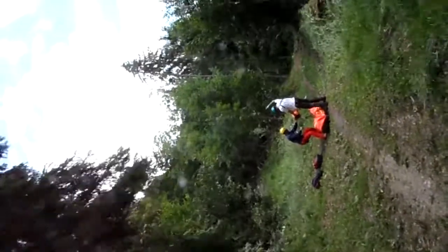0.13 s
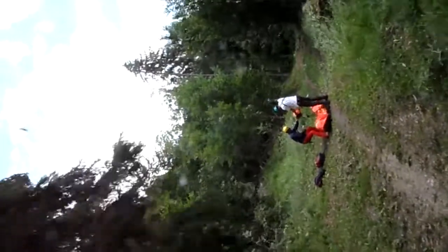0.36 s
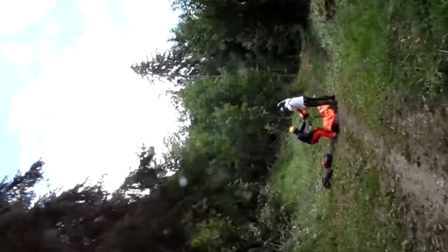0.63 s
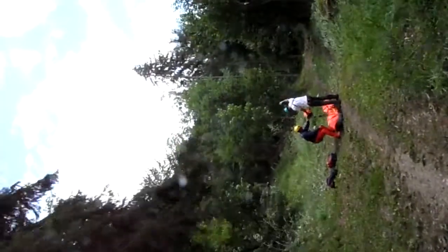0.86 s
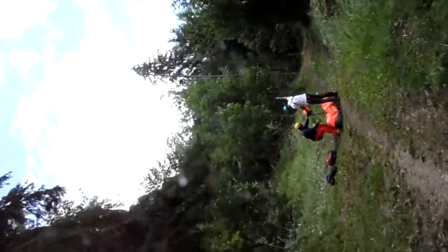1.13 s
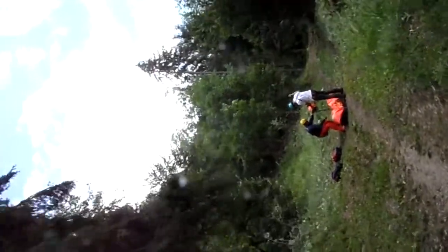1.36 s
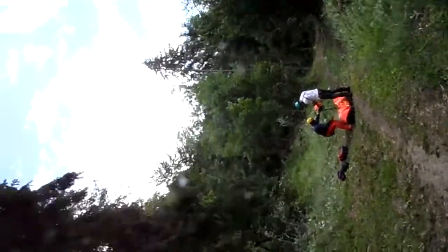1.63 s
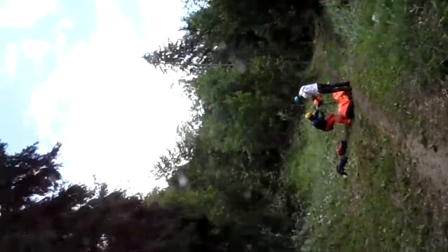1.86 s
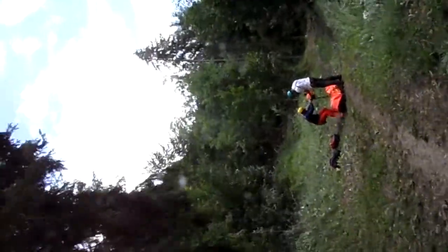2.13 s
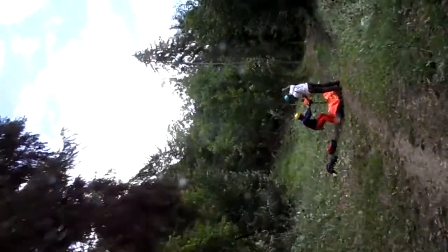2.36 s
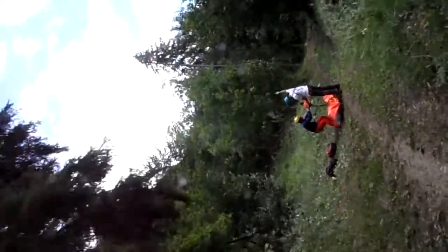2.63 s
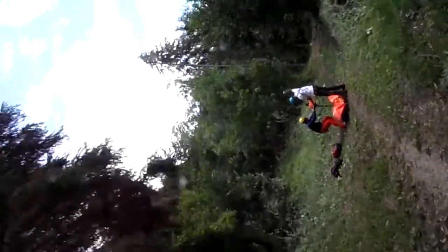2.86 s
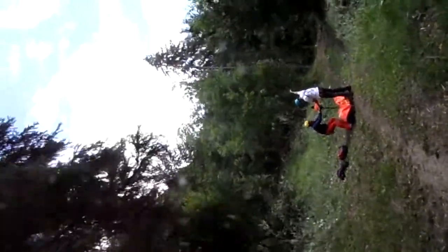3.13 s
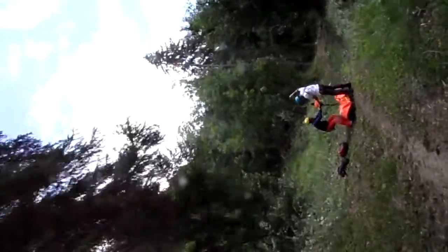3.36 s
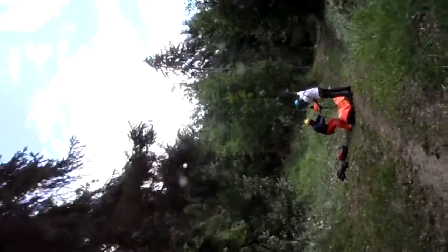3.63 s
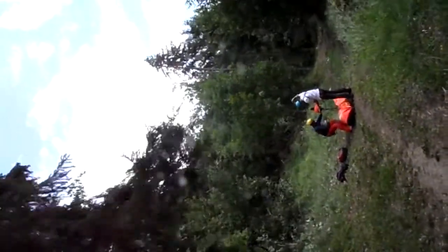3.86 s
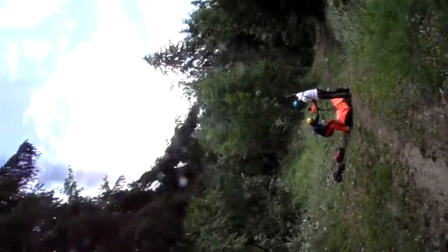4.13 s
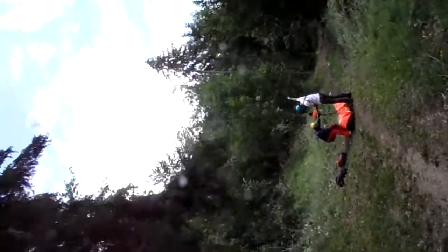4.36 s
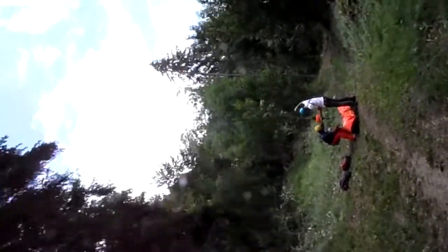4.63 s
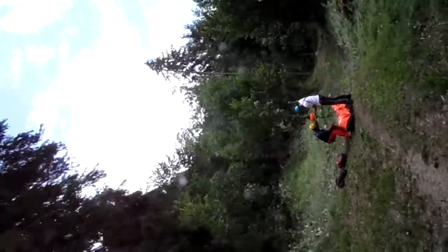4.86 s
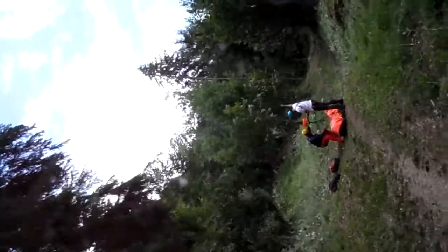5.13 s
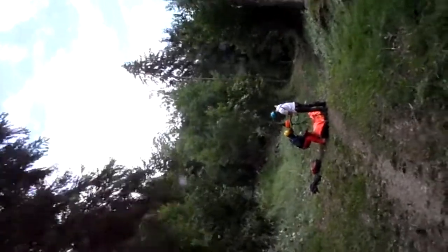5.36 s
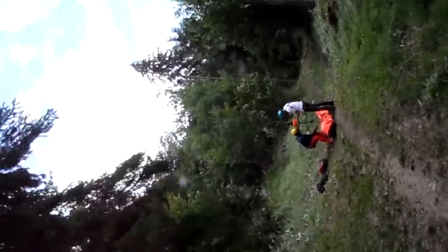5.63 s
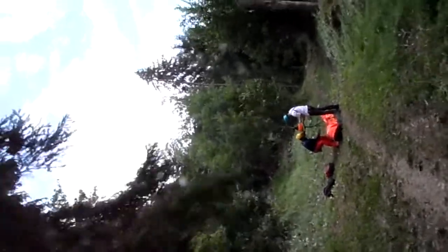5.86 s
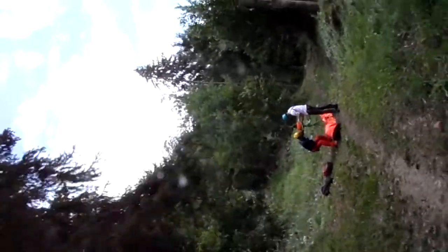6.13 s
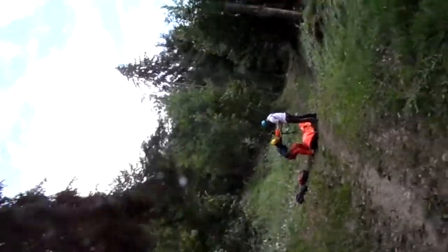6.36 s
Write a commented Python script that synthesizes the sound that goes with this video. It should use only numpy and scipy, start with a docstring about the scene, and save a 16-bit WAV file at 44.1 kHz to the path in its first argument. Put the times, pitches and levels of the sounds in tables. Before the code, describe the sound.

Outdoor handheld stereo capture under a hovering helicopter. A continuous droning hum and dull roar sit behind powerful wind buffeting, with low booming shoves, fluttering rumble, short rasps and sharp crackling pops differing left and right. The blade chop surfaces briefly around three seconds when the wind tearing stops. Strong blasts later overload the microphone, and the aircraft sound sinks and swells back. No speech.

```python
"""A forest clearing with a helicopter hovering above: the tail rotor hums as a sum of harmonics,
the main blades chop as gated noise bursts, and the turbines roar as patchy broadband noise.
The downwash buffets two microphone ports with lumps, flutter and rasp partly or wholly independent at
each port, with short swings a little out of step, and with crisp steps alike except in level.
At set times the whole sound drops in level and climbs back."""
import sys
import numpy as np
from scipy import signal
from scipy.fft import rfft, irfft, next_fast_len
from scipy.io import wavfile
from scipy.ndimage import uniform_filter1d, map_coordinates

SR = 44100
rng = np.random.default_rng(int(sys.argv[2]) if len(sys.argv) > 2 else 0)


def master_out(mix):
    """Clip the mix to full scale and print it as 16-bit PCM to the path in sys.argv[1]."""
    frames = np.transpose(np.atleast_2d(mix))
    ceiling = np.clip(frames, -1, 1)
    pcm = np.round(ceiling * 32767).astype(np.int16)
    wavfile.write(sys.argv[1], SR, pcm)


def gain_from_db(level_db):
    """Convert decibel levels to linear amplitude factors (20 dB per decade)."""
    decades = np.asarray(level_db, float) / 20
    return 10 ** decades


N = 285988  # samples

# Source levels below apply ahead of the level dips and the rounding of peaks.
# Spectra give the shape only: (frequency [Hz], relative density [dB per Hz])
ROAR_SPECTRUM = [(15, -40), (50, -15.5), (100, -6), (250, -6.5), (600, -13), (1100, -22.5), (2000, -30),
                 (4000, -37.5), (6000, -41), (8000, -45), (10500, -48), (14200, -52.5)]
CHOP_SPECTRUM = [(200, -10.5), (500, 12.5), (1000, 3), (2000, -9), (4000, -23), (8000, -54)]
LUMP_SPECTRUM = [(5, 3), (14, 15.5), (28, 13), (45, 1.5), (70, -0.5), (140, -19), (300, -57.5)]
EDDY_SPECTRUM = [(30, -2.5), (70, 5.5), (150, -3), (300, -9.5), (600, -19.5), (1200, -32.5), (3000, -71.5)]
TEAR_SPECTRUM = [(150, -14), (400, 0), (1000, -6.5), (2000, -17), (3500, -31.5), (6000, -54)]
HISS_SPECTRUM = [(1500, -10), (3000, 3.5), (5000, -3.5), (7000, -13), (9000, -28), (14000, -50)]

# Treble of the roar: (time [s], gain [dB])
ROAR_TREBLE = [(0, 1), (.4, 2.5), (.6, -1.5), (1.9, 0), (2.5, 0.5), (3.3, -.5), (4.9, 0.5), (5.5, 2),
               (6.48, 0)]
# Tail rotor harmonics: (multiple of the blade rate [1], level [dB])
TAIL_HARMONICS = [(1, -23.5), (2, -22.5), (3, -20.5), (4, -31), (5, -27.5), (6, -32.5), (7, -49),
                  (8, -34.5), (9, -42.5)]
# Hum as the aircraft drifts:
# (time [s], level [dB], tilt per multiple about the third [dB], even over odd multiples [dB])
HUM_DRIFT = [(0, 0, 0, -2), (.45, -0.5, -0.5, 1.5), (1.1, 2.5, 1.5, -6.5), (1.6, 1.5, .5, -1.5),
             (2.2, 0.5, -1.5, -0.5), (2.9, -1, 0.5, 2.5), (3.7, -1, -1, 3), (4.3, -3, -0.5, 2),
             (4.95, -0.5, -2, -4), (5.6, 1.5, 1, -3), (6.48, 0, 0.5, -1)]
# Main blades cutting their own wake: (time [s], level [dB])
CHOP_LEVEL = [(0, -48), (.2, -30), (.35, -24.5), (.6, -35.5), (1.2, -29.5), (1.6, -48), (2.4, -46),
              (2.78, -30.5), (2.88, -20), (3.05, -25), (3.25, -29.5), (3.42, -28), (3.57, -21.5),
              (3.7, -25), (4.2, -32), (5.6, -32), (5.8, -24.5), (6.1, -38), (6.48, -43.5)]
# Correlation of the aircraft sound at the ports: (frequency [Hz], correlation [-1 to 1])
PORT_CORRELATION = [(60, .75), (150, .82), (400, .9), (900, .84), (1800, .7), (3500, .34), (5000, 0),
                    (6500, -.22), (9000, -.15), (13000, .2)]
# Balance of the aircraft sound: (frequency [Hz], left over right [dB])
PORT_BALANCE = [(60, -2.5), (240, -4), (930, -2.5), (3660, 1), (14400, 0)]

# Downwash between the shoves: (time [s], left level [dB], right level [dB])
WASH_LEVEL = [(0, -21, -25), (.5, -19, -14), (1.1, -12.5, -12.5), (1.6, -10, -16), (1.95, -10, -11),
              (2.08, -7, -15), (2.3, -13, -9), (2.7, -20, -18), (3.5, -17.5, -15.5), (4.2, -13.5, -16),
              (4.6, -12.5, -19.5), (5.1, -6, -17), (5.4, -21, -24), (5.6, -16, -26), (5.9, -14, -12.5),
              (6.2, -4, -8.5), (6.48, -13, -9)]
# Air tearing past a port edge:
# (start [s], length [s], left level [dB], right level [dB], hiss over tear [dB])
RASP_BURSTS = [(0.599, 0.011, -15, -34, -32), (0.628, 0.054, -18.5, -18, -20),
               (0.707, 0.037, -17.5, -18, -17), (0.943, .011, -37, -19, -24), (1.166, 0.032, -28, -18, -22),
               (1.25, 0.018, -17, -15, -22), (1.314, 0.062, -20, -18, -24), (1.48, 0.098, -16.5, -43, -24),
               (1.648, 0.11, -15.5, -38, -20.5), (1.818, 0.071, -18, -22, -19),
               (1.863, 0.075, -11, -11, -18), (1.938, .038, -15, -20.5, -9), (4.68, 0.083, -13, -44, -15.5),
               (5.043, 0.015, -16, -35, -23), (5.115, 0.111, -12, -12, -13),
               (5.824, 0.058, -17.5, -21, -30), (5.937, 0.0068, -7, -10, -33),
               (6.006, 0.019, -15, -37, -21), (6.126, 0.011, -6.5, -37, -18),
               (6.22, 0.071, -14.5, -38, -20), (6.31, 0.055, -13.5, -39, -20), (6.397, 0.074, -9, -38, -19)]
# Sudden pressure steps: (time [s], peak level [dB], left over right [dB])
PRESSURE_STEPS = [(.607, -6, 4), (.641, -14, 1), (.657, -14, 0), (.722, -10, 0), (1.258, -9, 0),
                  (1.647, -22, 9), (2.362, -2.5, 3), (2.432, -9, 7), (4.752, -6, 10), (4.866, -6, 18),
                  (5.055, -13.5, 18), (5.111, 0.5, 7), (5.187, -9, 6), (6.011, -5, 14), (6.021, -15, 11),
                  (6.114, -14, 16), (6.134, -9, 18), (6.411, -6, 15)]
# Single shoves of air:
# (centre [s], swing [Hz], left envelope peak [dB], right envelope peak [dB], flutter over shove [dB])
AIR_SHOVES = [(.068, 54.4, -19, -11, -12), (.215, 55, -20, -22, -19), (0.394, 41, -25, -12, -10),
              (0.442, 44, -9.5, -10.5, 0), (.515, 55, -17, -12, -24), (0.576, 41, -4, -4, -8.5),
              (0.72, 24, -3, -6, -6.5), (0.954, 43.6, -10, -1, -7.5), (1.194, 27, -4, -2, -17),
              (1.273, 29.6, -1, -1, -19), (1.357, 40, -5, -12, -18), (1.489, 45.7, -3, -2, -4),
              (1.652, 51, -1.5, -4, -13), (1.716, 54.6, -12.5, -6, 2.5), (1.775, 38, -1.5, -1, -14),
              (1.857, 33, -12, 4, -2), (1.928, 38, -4, 3, -3), (2.352, 52, -6, 0, -10),
              (2.437, 30.4, -7, -5.5, -5), (2.545, 32.8, -4, -7, -10.5), (2.9, 55, -12, -17, -10),
              (2.976, 55, -8, -10.5, -5), (3.043, 50, -9, -9, -8), (3.199, 40.3, -6, -5, -39),
              (3.259, 36.3, -3, -4.5, -17), (3.432, 45, -8, -14, -8.5), (3.52, 62, -16, -16, -5),
              (3.632, 50, -14, -8, -5), (3.8, 45, -20, -16, -3), (3.956, 55.6, -3, -22, -13),
              (4.077, 32, -11.5, -8, 0.5), (4.299, 28.8, -7, -4, -1.5), (4.391, 40, -1, -7, -25),
              (4.499, 23, -6, -7, -10), (4.57, 64, -9, -24, 5.5), (4.69, 41.8, 3.5, 2, -8),
              (4.756, 35, 5, 5, -9.5), (4.814, 48, 1.5, -7, -6), (4.868, 50.7, 11, -3, -14),
              (4.975, 45.3, 1, -22, -17), (5.052, 43.6, 7.5, 3.5, -12), (5.123, 58, -9, 6, -3.5),
              (5.221, 33, 4, 0, -22), (5.275, 22, 2, -2, -31), (5.549, 56.3, -4, -5, -36),
              (5.748, 40, -16, -4, 0.5), (5.819, 40, -10, -2.5, -3), (5.975, 45, 3, -2, -4.5),
              (6.051, 35, -2, -8, -1), (6.138, 38, 9.5, 2, -19), (6.233, 45.2, 1, -6, 0),
              (6.35, 27, -4, -6, -2), (6.408, 60, -5.5, -20, 8), (6.459, 33, 2.5, -6, -12)]
# Dips of the whole sound: (time of full depth [s], gain [dB])
LEVEL_DIPS = [(0, -4.5), (0.431, -6.5), (.6, -6.5), (.76, -8.5), (.97, -10.5), (1.3, -9.5), (1.48, -10),
              (1.66, -10), (1.85, -13), (1.99, -19.5), (2.44, -8), (2.93, -4.5), (3.06, -6.5), (3.26, -5.5),
              (3.65, -6.5), (3.9, -5.5), (4.08, -8), (4.31, -10), (4.5, -10), (4.68, -12), (4.77, -16.5),
              (4.88, -15.5), (5.07, -18.5), (5.17, -18.5), (5.25, -16.5), (5.76, -8), (5.94, -10),
              (6.05, -10.5), (6.14, -14), (6.26, -15), (6.4, -14)]

TAIL_HZ, BLADE_HZ = 74.37, 26.05  # blade passages per second: tail rotor, main rotor
TREBLE_FROM_HZ = 3300
FLUTTER_UNDER_DB = 6.5  # steady flutter below the wash level
SWING_CYCLES, STIR_S = 0.76, 0.038  # Gaussian 1/e half lengths: shove [cycles], stirred flutter [s]
FALL_S, HOLD_S, RECOVER_S, CALM_DB = 0.038, 0.1, 0.36, -0.5  # dip timing [s] and resting gain [dB]
TOP_HZ = 14250  # upper limit of the sound


def unit(x):
    """Normalisation: each row is divided by its root mean square."""
    return x / np.sqrt(np.mean(x ** 2, axis=-1, keepdims=True) + 1e-20)


def along(points, hz):
    """Logarithmic interpolation: (frequency, value) points are read on a log axis."""
    point_hz, value = np.transpose(points)
    return np.interp(np.log(hz + 1), np.log(point_hz + 1), value)


def curves(rows):
    """Piecewise linear control: each column after the time becomes one value per sample."""
    s, *columns = np.transpose(rows)
    t = np.arange(N) / SR
    return np.array([np.interp(t, s, column) for column in columns])


def wobble(rate, count=1):
    """Smooth fluctuation: splines join random knots, rate of them per second."""
    knots = rng.standard_normal((count, N // 50))
    position = np.arange(N) * rate / SR
    used = int(N * rate / SR) + 4
    return np.array([map_coordinates(row[:used], [position]) for row in knots])


def filtered(x, response):
    """Linear filtering: the spectrum is multiplied by a response of frequency."""
    size = next_fast_len(N + 8192)
    hz = np.fft.rfftfreq(size, 1 / SR)
    return irfft(rfft(x, size) * response(hz), size)[..., :N]


def noise(spectrum):
    """Coloured noise: two independent white noises are shaped by a spectrum and brought to rms 1."""
    white = rng.standard_normal((2, N))
    return unit(filtered(white, lambda hz: gain_from_db(along(spectrum, hz))))


def evened(x, window_s, share):
    """Compression: noise is divided by part of its own short-term level, then brought to rms 1."""
    power = np.abs(uniform_filter1d(x ** 2, int(window_s * SR), axis=1)) + 1e-3
    return unit(x / power ** (np.clip(share, 0, 1) / 2))


def turbines():
    """Broadband roar of exhaust, blades and shaken trees: noise swells in patches of time and pitch."""
    z = signal.stft(noise(ROAR_SPECTRUM), nperseg=512)[2]
    patches = uniform_filter1d(rng.standard_normal(z.shape[1:]), 8, axis=0)
    patches = uniform_filter1d(patches, 10, axis=1)
    patchy = z * gain_from_db(1.03 * patches / patches.std())
    roar = unit(signal.istft(patchy, nperseg=512)[1][:, :N])
    treble = filtered(roar, lambda hz: hz ** 2 / (hz ** 2 + TREBLE_FROM_HZ ** 2))
    return gain_from_db(-18.5) * (roar + (gain_from_db(curves(ROAR_TREBLE)) - 1) * treble)


def tail_rotor():
    """Harmonic series of the blade rate: moving air makes each overtone waver, the higher ones more."""
    t = np.arange(N) / SR
    count = len(TAIL_HARMONICS)
    order, tone_db = np.transpose(TAIL_HARMONICS)[:, :, None]
    hum_db, tilt_db, even_db = curves(HUM_DRIFT)
    waver_db = np.sqrt(order) * (.8 * wobble(5, count=count) + .4 * wobble(1.5, count=count))
    level_db = tone_db + hum_db + tilt_db * (order - 3) + even_db * (order % 2 == 0) + waver_db
    # one phase drift is shared by all overtones, a smaller one belongs to each
    drift = .2 * wobble(4) + 0.051 * wobble(8, count=count)
    start = rng.uniform(0, 2 * np.pi, (count, 1))
    phase = order * (2 * np.pi * TAIL_HZ * t + drift) + start
    hum = np.sqrt(2) * np.sum(gain_from_db(level_db) * np.sin(phase), axis=0)
    return np.array([hum, 0.22 * hum])


def main_rotor():
    """Periodic amplitude modulation: each blade passage gates a noise burst of random size."""
    turns = BLADE_HZ * np.arange(N) / SR + .53  # blade passages so far
    size_db = 1.5 * rng.standard_normal(N // 1000)[turns.astype(int)]
    # the gate peaks once per blade passage
    gate = np.exp(1.6 * (np.cos(2 * np.pi * (turns - .5)) - 1))
    bursts = gate * gain_from_db(size_db + 2.2 * wobble(150)) * noise(CHOP_SPECTRUM)
    return gain_from_db(curves(CHOP_LEVEL)) * unit(bursts)


def at_ports(pair):
    """Spatial coherence: long waves from afar reach both ports alike, short ones do not."""
    def mid_side_gain(hz):
        angle = np.arccos(np.clip(along(PORT_CORRELATION, hz), -1, 1)) / 2
        return np.sqrt(2) * np.array([np.cos(angle), np.sin(angle)])

    mid, side = filtered(pair, mid_side_gain)
    ports = np.array([mid + side, mid - side]) / np.sqrt(2)
    return filtered(ports, lambda hz: gain_from_db(np.outer([.5, -.5], along(PORT_BALANCE, hz))))


def stirred():
    """Turbulence around a shove: flutter swells and fades evenly about its centre, at each port."""
    s, _, left_db, right_db, over_db = np.transpose(AIR_SHOVES)
    t = np.arange(0, N, 32) / SR
    bell = np.exp(-((t - s[:, None]) / STIR_S) ** 2)
    level = gain_from_db([left_db + over_db, right_db + over_db]) @ bell
    return np.repeat(level, 32, axis=1)[:, :N]


def buffeting():
    """Turbulent pressure: large lumps are slightly shared by the ports, small eddies hit each alone."""
    left, right = noise(LUMP_SPECTRUM)
    lumps = evened(np.array([left, 0.19 * left + 2.5 * right]), window_s=0.16, share=0.19)
    eddies = evened(noise(EDDY_SPECTRUM), window_s=0.0435, share=1.0)
    eddies = eddies * gain_from_db(2.44 * wobble(35, count=2))
    wash = gain_from_db(curves(WASH_LEVEL))
    steady = wash * gain_from_db(3.5 * wobble(9, count=2) - FLUTTER_UNDER_DB)
    flutter = steady + uniform_filter1d(stirred(), size=64, axis=1)
    return wash * lumps + flutter * unit(eddies)


def snaps():
    """Pressure step at a port edge: it rises in a blink and leaks away exponentially within about 2 ms."""
    out = np.zeros((2, N + SR))
    t = np.arange(SR // 50) / SR
    step = np.exp(-t / .0004) * (1 - np.exp(-t / .00012)) ** 2
    step = step / step.max()
    signs = np.sign(rng.standard_normal(len(PRESSURE_STEPS)))
    for (s, db, pan_db), sign in zip(PRESSURE_STEPS, signs):
        gain = gain_from_db([[db + pan_db / 2], [db - pan_db / 2]])
        out[:, round(s * SR):][:, :len(t)] += gain * sign * step
    return out[:, :N]


def rasp():
    """Gated edge turbulence: bursts with sudden edges hold a ragged tearing and a thinner hiss."""
    tear, hiss = np.zeros((2, 2, N))
    for s, length, left_db, right_db, hiss_db in RASP_BURSTS:
        span = slice(round(s * SR), round((s + length) * SR))
        tear[:, span] = gain_from_db([[left_db], [right_db]])
        hiss[:, span] = gain_from_db([[left_db + hiss_db], [right_db + hiss_db]])
    ragged = gain_from_db(2.4 * wobble(160, count=2) + 1.8 * wobble(500, count=2))

    def soften(gain):
        return uniform_filter1d(gain, int(0.005 * SR), axis=1)

    tearing = soften(tear) * unit(ragged * noise(TEAR_SPECTRUM))
    return tearing + soften(hiss) * unit(ragged * noise(HISS_SPECTRUM))


def shoves():
    """Transient displacement: each shove swings the membranes about once, the right one out of step."""
    out = np.zeros((2, N + SR))
    t = np.arange(-SR // 8, SR // 8) / SR
    draws = rng.standard_normal((len(AIR_SHOVES), 2))
    for (s, hz, left_db, right_db, _), (start, skew) in zip(AIR_SHOVES, draws):
        phase = 2 * np.pi * hz * t + np.pi * start + np.array([[0], [.9 * skew]])
        swing = np.exp(-(t * hz / SWING_CYCLES) ** 2) * np.cos(phase)
        out[:, round(s * SR):][:, :len(t)] += gain_from_db([[left_db], [right_db]]) * swing
    return out[:, SR // 8:][:, :N]  # the swings are centred on their times


def dip_gain_db():
    """Exponential recovery: the gain falls to each listed depth, holds and creeps back."""
    t = np.arange(0, N, 32) / SR
    s, low_db = np.transpose(LEVEL_DIPS)[:, :, None]
    fall = np.clip((t - s) / FALL_S + 1, 0, 1)
    recovery = np.exp(-np.maximum(t - s - HOLD_S, 0) / RECOVER_S)
    # where dips overlap, the deepest one rules
    gain_db = CALM_DB + np.min((low_db - CALM_DB) * recovery * fall, axis=0)
    return np.interp(np.arange(N) / SR, t, gain_db)


def scene():
    """Superposition: the aircraft arrives through the air, the wind acts right at the ports."""
    aircraft = at_ports(tail_rotor() + main_rotor() + turbines())
    return aircraft + buffeting() + shoves() + rasp() + snaps()


def low_pass(x):
    """Removes everything above the highest recorded frequency."""
    return signal.sosfilt(signal.butter(12, 15030, fs=SR, output="sos"), x)


def record(dry):
    """Level dips and saturation: the level falls at listed times, tall peaks are rounded, the top is cut."""
    dipped = dry * gain_from_db(dip_gain_db())
    rounded = dipped / (1 + np.abs(dipped / .72) ** 5) ** (1 / 5)
    mix = filtered(rounded, lambda hz: hz < TOP_HZ)
    return low_pass(mix)


dry = scene()
out = record(dry)
master_out(out)
```